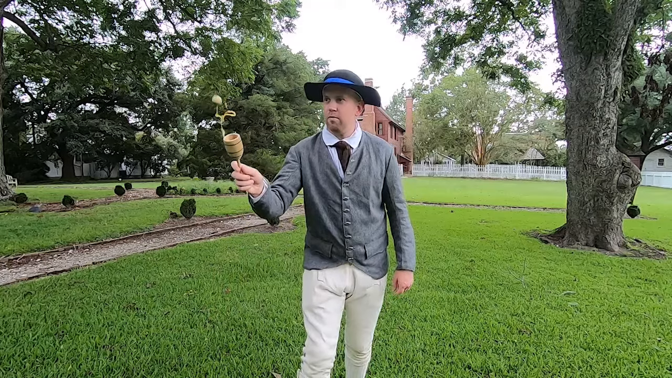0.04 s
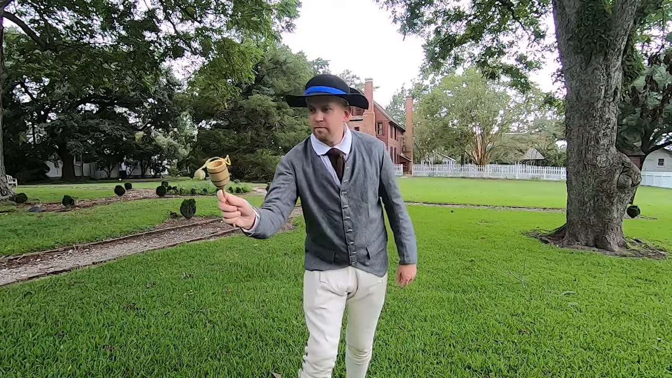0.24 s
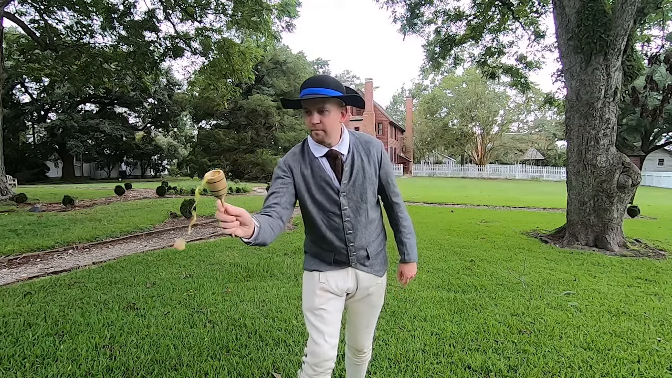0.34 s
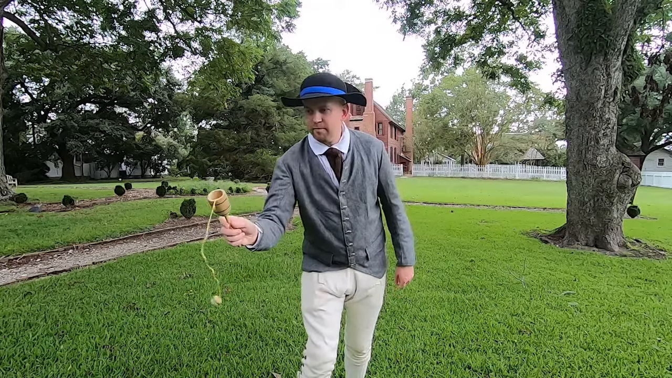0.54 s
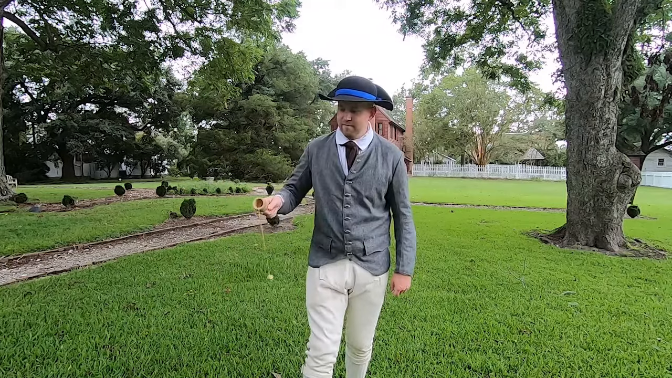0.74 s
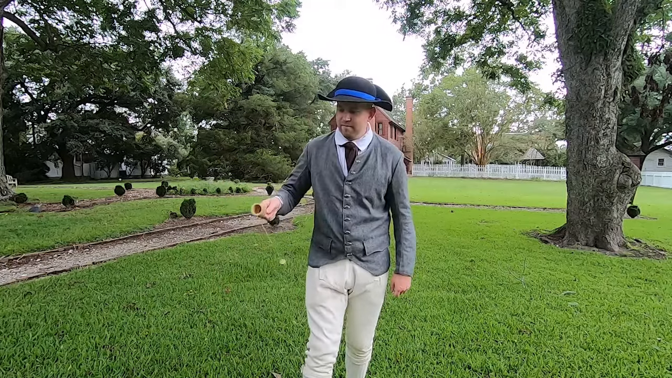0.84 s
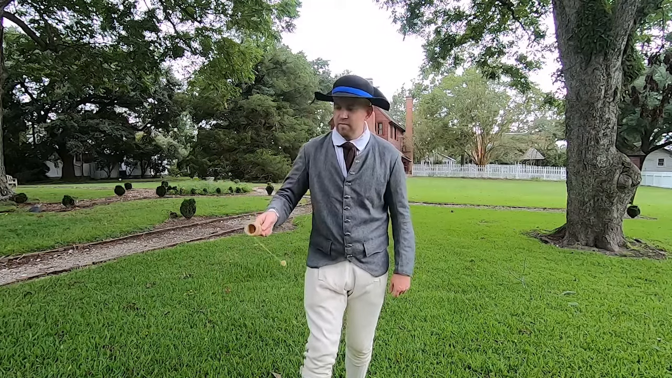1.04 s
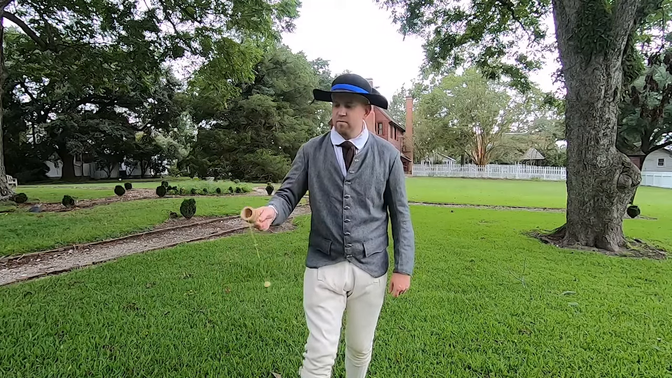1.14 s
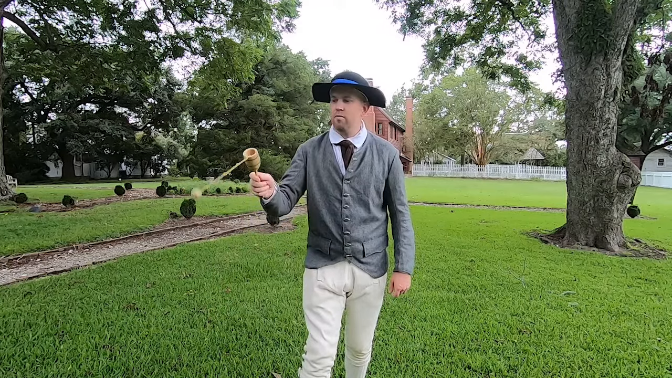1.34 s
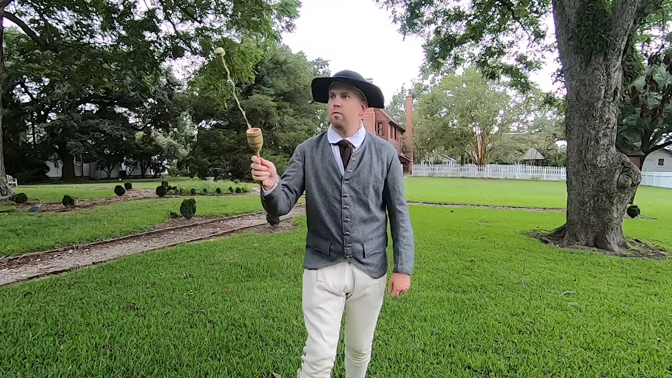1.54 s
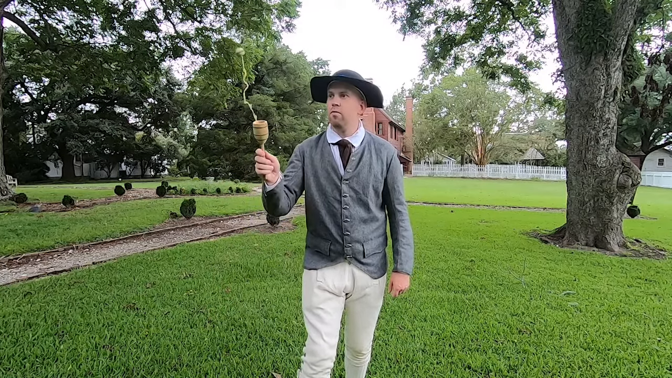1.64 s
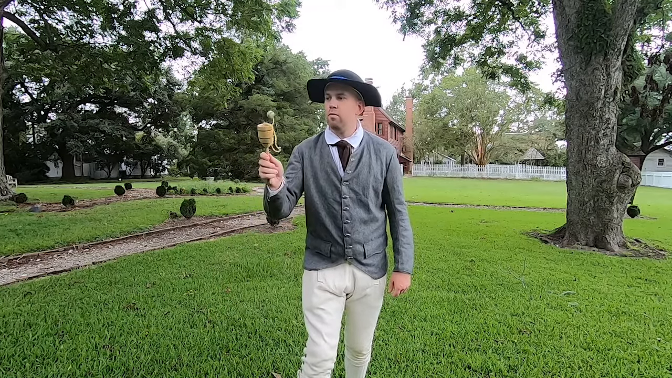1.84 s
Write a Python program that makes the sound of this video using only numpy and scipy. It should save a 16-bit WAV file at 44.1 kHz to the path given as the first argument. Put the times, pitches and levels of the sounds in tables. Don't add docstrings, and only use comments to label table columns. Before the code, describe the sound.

A hard wooden ball knocks a hollow wooden cup once, bounces softly right after, and the clack scatters off trees; then only quiet cicadas, cricket chirps and low distant rumble, picked up outdoors by a camera microphone.

```python
import sys
import numpy as np
from scipy import signal
from scipy.fft import rfft, irfft, next_fast_len
from scipy.io import wavfile
from scipy.ndimage import map_coordinates

SR = 44100
rng = np.random.default_rng(int(sys.argv[2]) if len(sys.argv) > 2 else 0)


def store_wav(level_fs):
    pcm = np.round(np.clip(np.atleast_2d(level_fs), -1, 1) * 32767)
    wavfile.write(sys.argv[1], SR, pcm.T.astype(np.int16))


def ratio(d):
    e = np.asarray(d, float) / 20
    return 10 ** e


N = 83790


def unit(x):
    return x / np.sqrt(np.mean(x ** 2) + 1e-20)


def along(points, hz):
    point_hz, value = np.transpose(points)
    return np.interp(np.log(hz + 1), np.log(point_hz + 1), value)


def pan(db):
    return ratio(np.array([[db / 2], [-db / 2]]))


def wobble(rate):
    return map_coordinates(rng.standard_normal(int(N * rate / SR) + 4), [np.arange(N) * rate / SR])


def filtered(x, response):
    size = next_fast_len(N + SR // 2)
    hz = np.fft.rfftfreq(size, 1 / SR)
    return irfft(rfft(x, size) * response(hz), size)[..., :N]


def rush(gain):
    # pitch_hz, likeness (1 same, 0 unrelated, -1 opposite)
    alike = [(60, .98), (150, 0.99837), (230, 0.8), (370, 0.57), (580, -0.44), (1430, 0.018), (3540, .5),
             (5570, -0.14)]

    def mid_side(hz):
        turn = np.arccos(np.clip(along(alike, hz), -1, 1)) / 2
        return gain(hz) * [np.cos(turn), np.sin(turn)]

    mid, side = filtered(rng.standard_normal((2, N)), mid_side)
    return unit(np.array([mid + side, mid - side]))


def bell(centre_hz, wide_hz):
    return lambda hz: np.exp(-((hz - centre_hz) / wide_hz) ** 2)


def hump(start_s, length_s, power=1):
    progress = np.clip((np.arange(N) / SR - start_s) / length_s, 0, 1)
    return np.sin(np.pi * progress) ** power


def knock(start_s, level_db, upper_db, top_db):
    # pitch_hz, level_db, fade_s (time to fall 60 dB)
    cup = [(1346, -23.5, 0.04), (1580, -15, 0.028), (1684, -4, 0.019), (1890, -11.5, 0.016),
           (2240, -20, .012)]
    # pitch_hz, level_db, fade_s
    wood = [(3273, -2.5, .04), (3497, -11.5, .045), (3640, -18, .012)]
    # pitch_hz, level_db, fade_s
    top = [(5020, -8.5, 0.0026), (5950, -24, 0.025), (7020, -14.5, 0.024), (7300, -23, .006),
           (11500, -33.5, .006)]
    crack_db, crack_fade_s, rise_s = -13, 0.0088, 0.00022
    t = np.clip(np.arange(N) / SR - start_s, 0, None)

    def ring(modes):
        return sum(ratio(db - 60 * t / fade_s) * np.sin(2 * np.pi * hz * t) for hz, db, fade_s in modes)

    crack_band = signal.butter(2, [3500, 7750], "band", fs=SR)
    crack = signal.lfilter(*crack_band, rng.standard_normal(N))
    crack = crack * ratio(crack_db - 60 * t / crack_fade_s)
    parts = ring(cup) * pan(7)
    parts = parts + ratio(upper_db) * ring(wood) * pan(4)
    parts = parts + ratio(top_db) * (crack - ring(top)) * pan(-2.5)
    body_band = signal.butter(2, [1100, 8500], "band", fs=SR)
    onset = 1 - np.exp(-t / rise_s)
    return -ratio(level_db - 4.5) * signal.lfilter(*body_band, onset * parts)


def trees(x):
    # pitch_hz, fade_s (time to fall 60 dB)
    tree_fade = [(500, .3), (1600, 0.59), (3300, 0.93), (6000, .4), (12000, .2)]
    gap_s = 0.0037
    hz, t, grains = signal.stft(rng.standard_normal((2, SR)), SR, nperseg=256)
    fade = ratio(-60 * t / along(tree_fade, hz)[:, None])
    tail = signal.istft(grains * fade, SR, nperseg=256)[1]
    late = np.pad(x, (round(gap_s * SR), 0))
    return ratio(-20.5) * signal.fftconvolve(late[None], tail / np.linalg.norm(tail[0]), axes=1)[:, :N]


def leaves(x):
    # pitch_hz, level_db
    leaf_colour = [(1500, -32), (3500, -16.5), (5000, -3.5), (5950, -6.5), (7000, -8.5), (8500, 9.5),
                   (11500, 8.5), (12500, -32)]
    level_db, fade_db, length_s = -12.5, -1.5, .115
    t = np.arange(SR // 4) / SR
    fade = ratio(fade_db * t / length_s) / (1 + (t / length_s) ** 10)
    tail = rng.standard_normal((2, len(t))) * fade
    wet = signal.fftconvolve(x[None], tail / np.linalg.norm(tail[0]), axes=1)[:, :N]
    return ratio(level_db) * pan(-4) * filtered(wet, lambda hz: ratio(along(leaf_colour, hz)))


def echoes(x):
    # delay_s, level_db, left_over_right_db
    returns = [
        (.017, -29.5, 19),
        (.073, -26, -9),
        (.0975, -23.5, -9),
        (.244, -60, -12),
        (.284, -31, 4),
    ]
    smear_s, smear_growth = 0.017, .2
    t = np.arange(SR // 10) / SR
    out = 0
    for delay_s, level_db, pan_db in returns:
        smear = rng.standard_normal((2, len(t))) * ratio(-60 * t / (smear_s + smear_growth * delay_s))
        smear = smear / np.linalg.norm(smear, axis=1, keepdims=True)
        smear = np.pad(smear, ((0, 0), (round(delay_s * SR), 0)))
        out = out + ratio(level_db) * pan(pan_db) * signal.fftconvolve(x[None], smear, axes=1)[:, :N]
    return out


def toy():
    # start_s, level_db (peak), upper_db (wood), top_db (highest ringing and crack)
    blows = [
        (0.2349, -8.5, 1.5, 5),
        (0.2756, -17, -7.5, -11),
    ]
    # pitch_hz, level_db
    echo_colour = [(1000, -4.5), (1700, -5.5), (3300, -5), (3500, 1.5), (4500, -11), (8000, -20)]

    def dulled(blow):
        return filtered(blow.mean(0), lambda hz: ratio(along(echo_colour, hz)))

    hits = [knock(*row) for row in blows]
    direct = sum(hits)
    return direct + trees(dulled(direct)) + leaves(direct.mean(0)) + echoes(dulled(hits[0]))


def rustle():
    # start_s, fade_s (time to fall 60 dB), level_db
    puffs = [
        (1.255, .2, -59),
        (1.54, .4, -65),
        (1.788, .3, -64),
    ]
    # pitch_hz, level_db
    cloth_colour = [(300, -14), (1200, -5.5), (2200, 0.5), (3300, -9), (5000, -24), (12000, -44.5),
                    (15000, -54)]
    # pitch_hz, level_db
    tick_colour = [(200, -6), (600, 0), (1200, -10), (4000, -18), (9000, -24), (12300, -27), (13000, -60)]
    t = np.arange(N) / SR

    def puff(start_s, fade_s, level_db):
        since = t - start_s
        soft_start = np.clip(since / .0007, 0, 1) ** 2
        return ratio(level_db - 60 * np.clip(since, 0, None) / fade_s) * soft_start

    grain = ratio(1.7 * wobble(150))
    cloth = sum(puff(*row) for row in puffs) * grain * rush(lambda hz: ratio(along(cloth_colour, hz)))
    tick = puff(.6645, .016, -52) * rush(lambda hz: ratio(along(tick_colour, hz)))[0]
    return cloth + tick


def cicadas():
    # pitch_hz, level_db
    chorus_colour = [(3530, -56.5), (6000, -37), (6240, -22), (6360, -11), (6750, 3), (7110, -3.5),
                     (7340, -10.5), (7810, -14.5), (8100, -28.5), (10500, -66.5), (17800, -120)]
    # time_s, level_db
    chorus_level = [(0, -62), (.6, -63.5), (1.2, -62.5), (1.9, -62.5)]
    time_s, level_db = np.transpose(chorus_level)
    flutter_db = 1.2 * wobble(90) + .8 * wobble(30) + .7 * wobble(4)
    loudness = ratio(np.interp(np.arange(N) / SR, time_s, level_db) + flutter_db)
    return loudness * rush(lambda hz: ratio(along(chorus_colour, hz)))


def cricket():
    # start_s, level_db
    chirps = [
        (.09, -66),
        (.613, -66),
        (.774, -66),
        (1.035, -65),
        (1.296, -64),
        (1.5514, -63),
        (1.8218, -64),
    ]
    pulse_gap_s, pulse_s = .0198, .009
    gate = 0
    for start_s, level_db in chirps:
        for k in range(3):
            pulse_db = level_db - 3.9 * (k == 0)
            gate = gate + ratio(pulse_db) * hump(start_s + k * pulse_gap_s, pulse_s)
    pitch_hz = 3680 + 40 * wobble(60)
    return pan(2.0) * gate * np.sin(2 * np.pi * np.cumsum(pitch_hz) / SR)


def katydids():
    # start_s, level_db
    bursts = [
        (.02, -84),
        (.32, -88),
        (.61, -81),
        (.91, -73.5),
        (1.22, -76),
        (1.52, -73),
        (1.83, -76),
    ]
    # start_s, length_s, level_db
    phrases = [
        (0, .2, -80),
        (.24, 0.33, -82),
        (.62, 0.11, -82),
        (.88, .33, -82),
        (1.33, 0.14, -78.5),
        (1.56, 0.15, -76.5),
        (1.8, 0.0965, -80.5),
    ]
    burst_s = 0.098
    first = sum(ratio(level_db) * hump(start_s, burst_s, power=0.95) for start_s, level_db in bursts)
    first = first * rush(bell(8370, 200))
    second = sum(ratio(level_db) * hump(start_s, length_s, power=.5) for start_s, length_s, level_db in phrases)
    second = second * rush(bell(9170, 220)) * ratio(3 * wobble(70))
    return (first + second) * pan(-2.5)


def bird():
    # start_s, length_s, from_hz, to_hz, waver_hz, level_db
    whistles = [
        (.07, .18, 3330, 3265, 12, -67),
        (.16, .08, 4960, 4920, 30, -79),
        (.36, .2, 3110, 3070, 25, -71),
        (.68, .07, 3060, 3050, 30, -73),
    ]
    t = np.arange(N) / SR
    song = 0
    for start_s, length_s, from_hz, to_hz, waver_hz, level_db in whistles:
        glide_hz = np.interp(t, [start_s, start_s + length_s], [from_hz, to_hz])
        pitch_hz = glide_hz + waver_hz * wobble(120)
        tone = np.sin(2 * np.pi * np.cumsum(pitch_hz) / SR)
        song = song + ratio(level_db) * hump(start_s, length_s, power=0.88) * tone
    return pan(1.7) * song * ratio(3 * wobble(68))


def town():
    # pitch_hz, level_db
    rumble_colour = [(12, -23.5), (20, 6.5), (112, 0), (140, -6.5), (184, -11), (211, -14.5), (243, -17.5),
                     (266, -20.5), (420, -37.5), (550, -66), (920, -120)]
    # time_s, level_db
    rumble_level = [(0.0, -48), (0.026, -46), (0.184, -46.5), (0.268, -43), (0.502, -50.5), (1.126, -46.5),
                    (1.81, -47), (1.9, -41.5)]
    # pitch_hz, width_hz, level_db
    hum_lines = [(177.2, 12, -62.5), (238.5, 4.5, -65.5), (1887, 43, -76.5), (3450, 60, -95),
                 (6895, 67, -66.5)]
    # pitch_hz, level_db
    air_colour = [(480, -8), (750, 0.5), (1800, -6.5), (2600, -13), (3500, -13), (4100, -18.5),
                  (9500, -23.5), (11800, -36.5)]
    mic_low_hz, air_top_hz = 25, 12000

    def rumble_gain(hz):
        return ratio(along(rumble_colour, hz)) * hz ** 2 / (hz ** 2 + mic_low_hz ** 2)

    def air_gain(hz):
        return ratio(along(air_colour, hz)) * (hz > 250) / (1 + (hz / air_top_hz) ** 30)

    time_s, level_db = np.transpose(rumble_level)
    low = ratio(np.interp(np.arange(N) / SR, time_s, level_db)) * rush(rumble_gain)
    hums = sum(ratio(hum_db) * rush(bell(hz, wide_hz)) for hz, wide_hz, hum_db in hum_lines)
    air = ratio(-63 + 0.91 * wobble(1.7)) * rush(air_gain)
    return low + hums + air


def scene():
    wide = cicadas() + rustle() + town()
    return toy() + cricket() + katydids() + bird() + pan(-.9) * wide


def band_limit(x):
    return signal.sosfilt(signal.butter(12, 15500, fs=SR, output="sos"), x)


def record(dry):
    return band_limit(dry)


dry = scene()
out = record(dry)
store_wav(out)
```